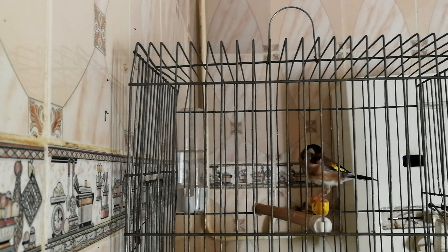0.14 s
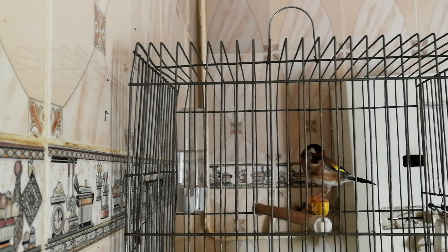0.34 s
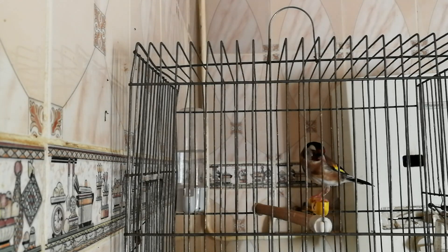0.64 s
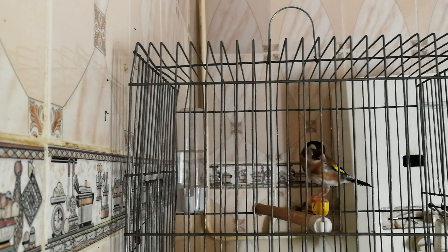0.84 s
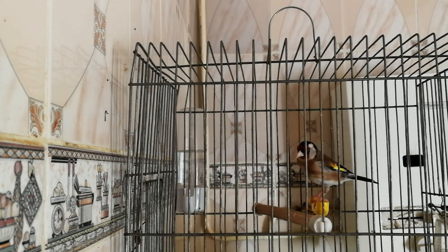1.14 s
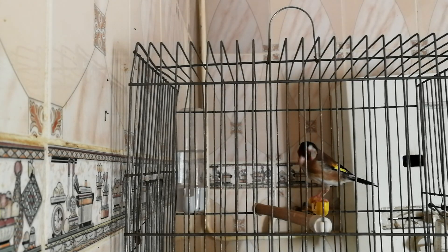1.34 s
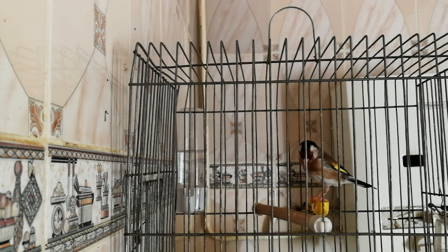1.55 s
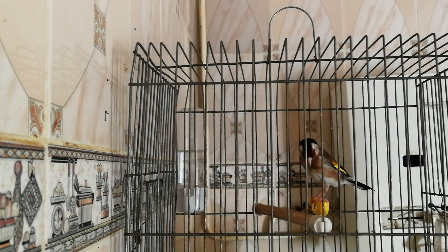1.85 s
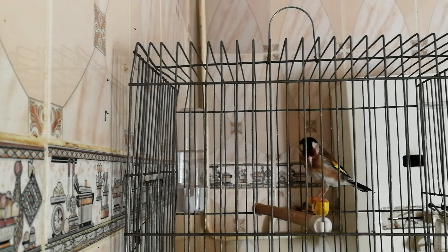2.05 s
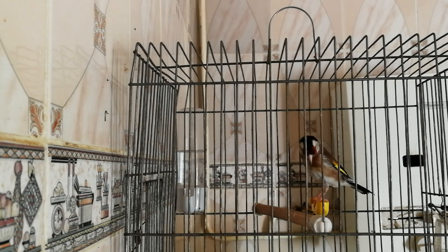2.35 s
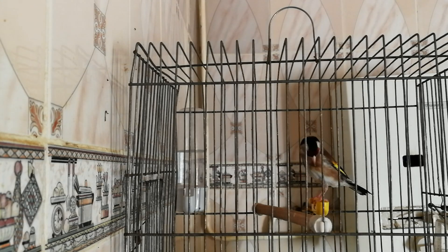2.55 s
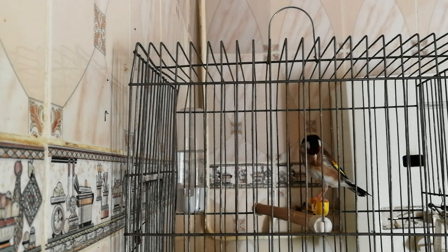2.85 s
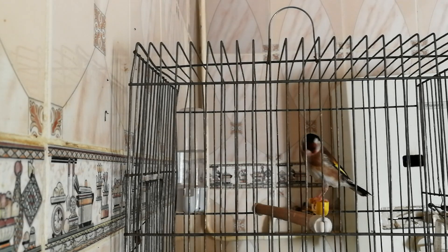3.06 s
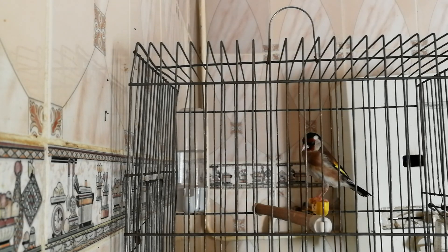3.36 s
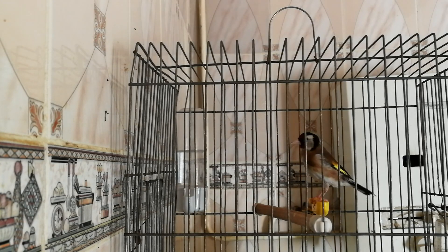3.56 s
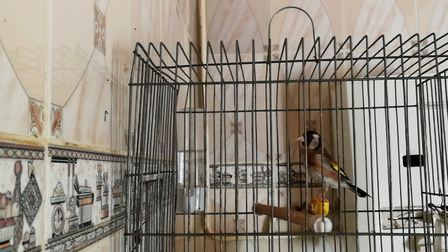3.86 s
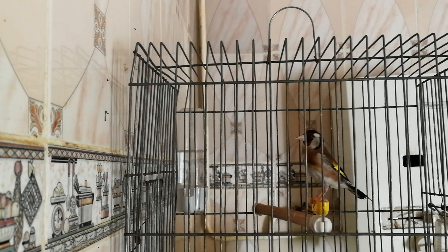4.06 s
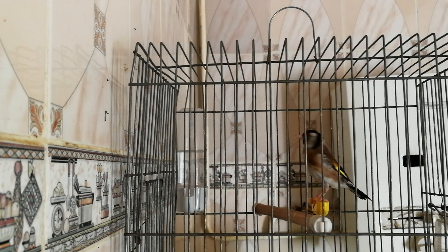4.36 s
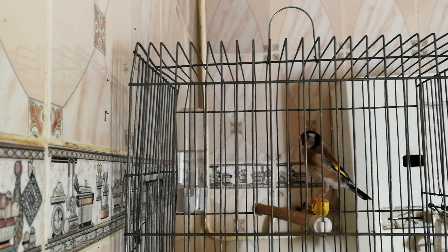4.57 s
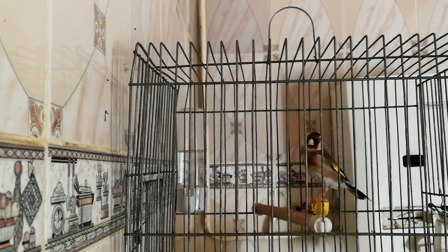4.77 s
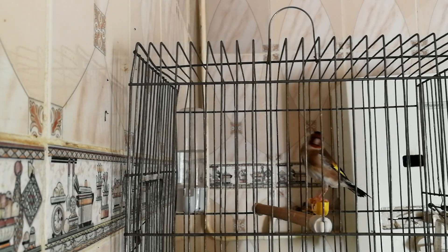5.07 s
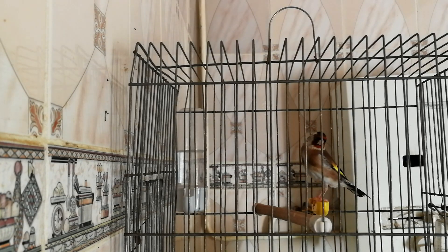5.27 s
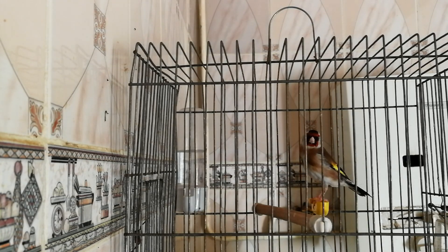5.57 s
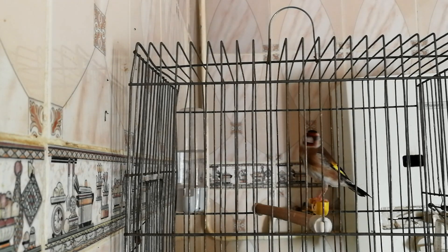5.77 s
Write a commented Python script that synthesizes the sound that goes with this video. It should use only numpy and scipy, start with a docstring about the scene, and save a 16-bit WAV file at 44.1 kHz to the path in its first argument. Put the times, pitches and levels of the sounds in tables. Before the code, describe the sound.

A small finch twitters in a cage in a tiled room, close to the microphone. Scattered soft whistles and short buzzy trills come first, then a quick burst of loud, sharp chirps just past the middle and two more chirps a second later. Feathers rustle faintly, beak or claws tick on the cage, and a soft knock comes near the end. A faint motor hum runs underneath.

```python
"""A caged goldfinch sings in a tiled room, close to a stereo microphone.
Its syrinx makes near-pure tones: a few loud, fast-gliding calls up front, and between them
soft whistles and trilled churrs that reach the microphone mostly off the walls.
Feathers rustle, beak and claws tick on the cage, and dull shuffles and knocks come from
further off to the left, all over a household motor's hum, a faint whine and room tone."""
import sys
import numpy as np
from scipy import signal
from scipy.fft import rfft, irfft, next_fast_len
from scipy.io import wavfile

SR = 44100
rng = np.random.default_rng(int(sys.argv[2]) if len(sys.argv) > 2 else 0)


def materialize(psi):
    """Save the field psi as 16-bit PCM at rate SR to the path in sys.argv[1].

    A 1-D psi becomes a single channel; in a 2-D psi each row is a channel.
    """
    bounded = np.clip(np.atleast_2d(psi).T, -1, 1)
    quanta = np.round(bounded * 32767).astype(np.int16)
    wavfile.write(sys.argv[1], SR, quanta)


N = 261072


def amp(db):
    return 10 ** (np.asarray(db) / 20)


def evened(x):
    return x / np.sqrt(np.mean(x ** 2) + 1e-20)


def read(points, hz):
    f, value = np.transpose(points)
    return np.interp(np.log(hz + 1), np.log(f + 1), value)


def add(mix, s, sound):
    part = mix[max(round(s * SR), 0):][:len(sound)]
    part += sound[:len(part)]


def colour(x, points, lag=None):
    """Filters by a (Hz, dB) curve, with an optional (Hz, s) curve of delay."""
    size = next_fast_len(x.shape[-1] + SR // 10)
    hz = np.fft.rfftfreq(size, 1 / SR)
    delay = np.exp(-2j * np.pi * hz * read(lag, hz)) if lag else 1
    return irfft(rfft(x, size) * amp(read(points, hz)) * delay, size)[..., :x.shape[-1]]


def wander(rate_hz):
    """Random drift of unit RMS, up to about the given rate."""
    size = next_fast_len(N)
    hz = np.fft.rfftfreq(size, 1 / SR)
    return evened(irfft(rfft(rng.standard_normal(size)) * np.exp(-(hz / rate_hz) ** 2), size)[:N])


def swells(rows):
    """Power over time of movements that swell and fade smoothly."""
    t = np.arange(N) / SR
    return sum(amp(db) ** 2 * np.exp(-((t - s) / half) ** 2) for s, half, db in rows)


def rustles(tick_power, grain_db=4.0, body_db=-10.5):
    """Grainy friction noise: bright for feathers and ticks, dull for shuffles and the feathers' body."""
    # near feathers and far shuffles: (peak time [s], half length [s], level [dB])
    feathers = [(-.019, 0.044, -46), (.156, 0.13, -61), (.28, 0.045, -59), (.403, 0.031, -54.5),
                (2.125, 0.042, -66), (2.222, .034, -68), (2.837, 0.019, -59.5), (3.085, 0.03, -57),
                (3.204, 0.041, -65.5), (4.02, 0.054, -64.5), (4.424, 0.043, -62.5), (4.95, 0.095, -61.5),
                (5.2, 0.024, -64), (5.309, 0.016, -65), (5.803, 0.083, -66)]
    shuffles = [(-.019, 0.052, -48.5), (4.157, 0.045, -57), (5.23, 0.1, -61), (5.536, 0.053, -65.5),
                (5.803, 0.094, -62)]
    # friction spectra: (frequency [Hz], gain [dB])
    bright_colour = [(100, -33.5), (1000, -42), (2200, -1), (4000, 0), (7000, 2), (9300, 0.5), (11500, -11),
                     (15500, -19.5)]
    dull_colour = [(100, -4), (600, -7), (1000, -6.5), (1500, 2.5), (2200, -6.5), (4000, -13.5),
                   (15000, -39)]
    feather_power = swells(feathers)
    dull_power = swells(shuffles) + amp(body_db) ** 2 * feather_power
    bright_grain, dull_grain = rng.standard_normal((2, N)) * amp(grain_db * wander(300))
    bright = np.sqrt(feather_power + tick_power) * evened(colour(bright_grain, bright_colour))
    dull = np.sqrt(dull_power) * evened(colour(dull_grain, dull_colour))
    return bright, dull


def motor_hum(waver_hz=7):
    """A household motor's low tones, dead centre, each wavering in strength and phase."""
    # motor tones: (frequency [Hz], level [dB], wavering [share])
    tones = [(83.3, -75.5, .6), (117.4, -62.5, 0.31), (152, -77, .8), (198.8, -65, 0.65), (244, -65.5, .9),
             (276.4, -66, 0.82), (296, -72.5, 0.44), (926, -84, .8)]
    t = np.arange(N) / SR
    out = np.zeros(N)
    for hz, db, waver in tones:
        sway = 1 + waver * (wander(waver_hz) + 1j * wander(waver_hz))
        out += amp(db) * evened((sway * np.exp(2j * np.pi * hz * t)).real)
    return out


def whine(waver_hz=110):
    """Faint electrical whine: narrow, slightly fuzzy tones, unrelated left and right."""
    # high tones: (frequency [Hz], level [dB])
    tones = [(4240, -96.5), (5080, -81), (7620, -85.5)]
    t = np.arange(N) / SR
    out = np.zeros((2, N))
    for channel in out:
        for hz, db in tones:
            fuzz = wander(waver_hz) + 1j * wander(waver_hz)
            channel += amp(db) * evened((fuzz * np.exp(2j * np.pi * hz * t)).real)
    return out


def room_tone(level_db=-61):
    """The room's still air: steady noise, alike in both channels only in the bass."""
    # noise spectrum: (frequency [Hz], relative density [dB])
    spectrum = [(25, -2), (60, -6), (110, -6), (170, -3.5), (260, -2), (390, -6), (600, -13.5), (950, -12),
                (1600, -13.5), (2800, -21.5), (5000, -21.5), (8500, -24), (11500, -30.5), (15500, -32)]
    # likeness of the channels: (frequency [Hz], correlation [-1 to 1])
    correlation = [(30, 0.97), (130, 1), (280, 0.63), (500, -0.42), (1000, -0.00085), (3000, 0.067),
                   (15000, -0.074)]
    # stereo balance: (frequency [Hz], left minus right [dB])
    balance = [(100, 0.5), (500, 3), (1200, 4), (2200, 5), (3300, -3.5), (6000, 0), (10000, 2),
               (15000, -0.5)]
    hz = np.fft.rfftfreq(N, 1 / SR)
    common, separate = rfft(rng.standard_normal((2, N)))
    same = np.clip(read(correlation, hz), -1, 1)
    tilt = amp(read(balance, hz) / 2)
    pair = np.array([common * tilt, (same * common + np.sqrt(1 - same ** 2) * separate) / tilt])
    return amp(level_db) * evened(irfft(pair * amp(read(spectrum, hz)), N))


def syrinx(hz, overtones_db, beak, fourth_db=-3, slack_hz=2750):
    """A near sine tuned by the throat; overtones escape through the beak, the fourth at low pitch."""
    # throat's response: (frequency [Hz], gain [dB])
    throat = [(2000, 0), (2600, -5.5), (3300, -6.5), (4100, -1), (4900, 0), (5600, -2), (6500, 11.5)]
    phase = 2 * np.pi * np.cumsum(hz) / SR
    second, third, fourth = (amp(read(beak, k * hz)) * (k * hz < SR / 2) * np.sin(k * phase)
                             for k in (2, 3, 4))
    slack = 1 / (1 + (hz / slack_hz) ** 10)  # slack membranes clap together and sound richer
    overtones = second + third + amp(fourth_db) * slack * fourth
    return np.sqrt(2) * (amp(read(throat, hz)) * np.sin(phase) + amp(overtones_db) * overtones)


def soft_note(length, pitch_hz, rise, warble, overtones_db, arch=0.048):
    """A soft note whose pitch slides in a slight arch, shaken by the warble."""
    # half-shut beak's response: (frequency [Hz], gain [dB])
    beak = [(4200, -14), (5200, -12), (6000, -5), (7400, 1.5), (8200, -12), (9200, -3.5), (10200, -12),
            (13000, -25), (16000, -32)]
    progress = np.linspace(0, 1, int(length * SR))
    bow = np.sin(np.pi * progress)
    contour_hz = pitch_hz * (1 + rise * (progress - .5)) * (1 + arch * (bow - 2 / np.pi))
    hz = contour_hz * (1 + warble[:len(progress)])
    return abs(bow) ** 0.098 * evened(syrinx(hz, overtones_db, beak))


def subsong(trill_hz=110, uneven=.3, rasp=0.392, churr_s=0.072):
    """One fast, uneven trill barely stirs the soft whistles and shakes the buzzy churrs deeply."""
    # whistles: (time [s], length [s], pitch [Hz], level [dB], overtones [dB])
    whistles = [(.002, 0.037, 4110, -52.5, -25), (0.152, 0.044, 2870, -51.5, -24),
                (0.735, 0.063, 2770, -54.5, -24), (1.574, 0.037, 2780, -55, -23),
                (1.606, 0.039, 2893, -39.5, -29), (1.999, 0.0574, 2813, -51, -22.5),
                (2.554, 0.035, 2720, -42, -27.5), (3.07, .056, 2864, -50.5, -30)]
    # churrs, most answering a whistle: (time [s], pitch [Hz], rise [share], level [dB], overtones [dB])
    churrs = [(.07, 3350, 0.024, -53.5, -14), (.256, 3060, 0.14, -52.5, -10.5),
              (.538, 4160, -0.15, -62.5, -28), (0.86, 3087, 0.012, -54.5, -24),
              (1.686, 3035, 0.017, -53.5, -22), (2.102, 3000, .08, -50, -17),
              (2.188, 3132, 0.115, -49.5, -16), (3.178, 3037, 0.047, -52, -26),
              (4.151, 2710, 0.051, -55.5, -16)]
    whistle_rise, whistle_warble, churr_warble = .075, 0.055, 0.159  # shares of the pitch
    out, shake = np.zeros(N), wander(426)
    trill_phase = 2 * np.pi * np.cumsum(trill_hz * (1 + uneven * wander(79.8))) / SR
    trill = np.clip(np.sin(trill_phase) + rasp * shake, -1.4, 1)
    for s, length, hz, db, overtones_db in whistles:
        warble = whistle_warble * trill[int(s * SR):]
        add(out, s, amp(db) * soft_note(length, hz, whistle_rise, warble, overtones_db))
    for s, hz, rise, db, overtones_db in churrs:
        warble = churr_warble * trill[int(s * SR):]
        add(out, s, amp(db) * soft_note(churr_s, hz, rise, warble, overtones_db))
    return out


def glide(length, start_hz, goal_hz, glide_s, bend):
    """Pitch that slides fast towards its goal; a bend over 1 starts slowly."""
    t = np.arange(int(length * SR)) / SR
    return goal_hz + (start_hz - goal_hz) * np.exp(-(t / glide_s) ** bend)


def loud_note(hz, shake, attack_s, db, overtones_db, jitter=0.0092, onset_rasp=1.9, rasp_s=0.0073):
    """Air pressure swells and is cut off as the syrinx sounds; onsets and low pitches are rough."""
    # beak's response: (frequency [Hz], gain [dB])
    beak = [(4500, 3.5), (5500, -12.5), (6200, -5), (6700, 2.5), (7300, -8), (8400, -18), (9400, 0),
            (10100, -14), (11000, -4.5), (11800, -12.5), (12600, -16.5), (13400, -11), (14500, -28),
            (16000, -26.5)]
    t = np.arange(len(hz)) / SR
    roughness = jitter * (2700 / hz) ** .6 * (1 + onset_rasp * np.exp(-t / rasp_s))
    hz = hz * (1 + roughness * shake[rng.integers(N // 2):][:len(hz)])
    peak_s = min(attack_s, .9 * t[-1])
    pressure = np.sin(np.interp(t, [0, peak_s, t[-1]], [0, np.pi / 2, np.pi]))
    # the overtones stay level however loud the note
    return amp(db) * pressure * syrinx(hz, overtones_db - db, beak)


def tinks(shake):
    """Close "tink" calls: one quick scoop up to a held pitch."""
    # calls: (time [s], length [s], level [dB], attack [s])
    calls = [(1.242, 0.03, -33, 0.017), (3.414, 0.043, -29, .016), (3.592, 0.044, -26, 0.02),
             (4.646, 0.028, -31, 0.012)]
    out = np.zeros(N)
    for s, length, db, attack_s in calls:
        scoop = glide(length, start_hz=2392, goal_hz=3340, glide_s=.0073, bend=1.67)
        add(out, s, loud_note(scoop, shake, attack_s, db, overtones_db=-34))
    return out


def cage_ticks(rise_s=0.0019):
    """Power over time of beak and claws on the cage: tiny scrapes that swell and die."""
    # scrapes: (time [s], level [dB])
    ticks = [(1.476, -64), (2.107, -42.5), (3.124, -43.5), (4.316, -61.5), (5.183, -60), (5.613, -59.5)]
    age = np.arange(SR // 10) / SR / rise_s
    power = np.zeros(N)
    for s, db in ticks:
        add(power, s, (amp(db) * age * np.exp(1 - age)) ** 2)
    return power


def zips(shake, flick_s=0.011, flick_gain_db=-11.5, sweep_delay_s=.0065):
    """Close "zip" calls: the pitch flicks down, then sweeps loudly upward."""
    # calls: (time [s], sweep length [s], sweep glide time [s], level [dB])
    calls = [(3.499, 0.043, 0.024, -19), (4.779, 0.029, 0.02, -21.5)]
    out = np.zeros(N)
    for s, length, glide_s, db in calls:
        flick = glide(flick_s, start_hz=3990, goal_hz=2670, glide_s=.0056, bend=2.6)
        sweep = glide(length, start_hz=2660, goal_hz=5490, glide_s=glide_s, bend=.93)
        add(out, s, loud_note(flick, shake, flick_s / 2, db + flick_gain_db, overtones_db=-34))
        add(out, s + sweep_delay_s, loud_note(sweep, shake, attack_s=0.018, db=db, overtones_db=-32))
    return out


def tsee(shake, at_s=3.7, attack_s=0.0089, upper_delay_s=0.0062, upper_s=0.01, upper_hz=6350):
    """A high "tsee" in two voices: one side of the syrinx falls, the other joins on a steady pitch."""
    falling = glide(length=0.031, start_hz=5840, goal_hz=5320, glide_s=0.0138, bend=1.43)
    upper = np.full(int(upper_s * SR), upper_hz)
    out = np.zeros(N)
    add(out, at_s, loud_note(falling, shake, attack_s, db=-22.5, overtones_db=-26.5))
    add(out, at_s + upper_delay_s, loud_note(upper, shake, attack_s, db=-32.5, overtones_db=-65))
    return out


def knocks(rise_s=0.0064):
    """Soft scuffing blows on a hollow body, well off the microphone."""
    # blows: (time [s], level [dB])
    blows = [(4.159, -57), (5.733, -41.5)]
    # body resonances: (frequency [Hz], gain [dB])
    body = [(300, -27), (700, -20), (950, -1.5), (1150, -3), (1430, 12), (1650, -2.5), (2100, -14),
            (4000, -40), (15000, -50)]
    age = np.arange(SR // 8) / SR / rise_s
    force = np.zeros(N)
    for s, db in blows:
        add(force, s, amp(db) * age * np.exp(1 - age))
    return force * evened(colour(rng.standard_normal(N), body))


def direct(x):
    """The straight path reaches the microphone's left side first and with more treble."""
    # response on each side: (frequency [Hz], gain [dB])
    left = [(2500, 7), (3300, -13), (4400, -1.5), (5600, 0), (6600, -4), (10000, 5), (14000, 3)]
    right = [(2500, 2), (3300, 0.5), (4400, 0), (5600, -12), (6600, -16.5), (10000, -16), (14000, -10.5)]
    # right side's lag, bent by a bounce off the near wall: (frequency [Hz], delay [s])
    right_lag = [(2800, .0006), (3350, .00064), (4100, .00052), (4600, .00046), (5500, .00054),
                 (6600, .00058), (9600, .00063), (12000, .00061)]
    return np.array([colour(x, left), colour(x, right, right_lag)])


def room(x, gap_s=0.002, early_s=0.0091):
    """Tiled walls: dense reflections, strongest at first, each band dying at its own speed."""
    # reverberation: (frequency [Hz], time to fall 60 dB [s])
    t60 = [(1000, 0.23), (3200, 0.42), (5500, 0.37), (10000, 0.26), (15000, 0.18)]
    hz, frame_s, bands = signal.stft(rng.standard_normal((2, SR)), SR, nperseg=256)
    decay = amp(-60 * frame_s / read(t60, hz)[:, None])
    tail = signal.istft(bands * decay, SR, nperseg=256)[1]
    t = np.arange(tail.shape[1]) / SR
    tail *= np.clip(t / gap_s - 1, 0, 1) * (1 + np.exp(-t / early_s))
    tail /= np.linalg.norm(tail, axis=1, keepdims=True)
    return signal.fftconvolve(x[None], tail, axes=1)[:, :N]


def scene():
    """Close calls, echoing subsong and small noises share one room; paired gains are left, right."""
    # colour of the loud calls' echo: (frequency [Hz], gain [dB])
    echo_colour = [(1000, 0), (2900, 7), (3400, 2.5), (4200, -2), (4800, -6), (5600, -4), (6600, -11),
                   (10000, -2.5), (14000, -6)]
    shake = wander(2270)  # pitch jitter of the loud calls
    loud = tinks(shake) + zips(shake) + tsee(shake)
    soft = subsong()
    bright, dull = rustles(cage_ticks())
    song = direct(loud) + amp(-1.5) * room(colour(loud, echo_colour))
    twitter = amp(-12.5) * direct(soft) + amp([[-1], [.5]]) * room(soft)
    near_stir = amp(-3) * direct(bright) + amp(1.5) * room(bright)
    far_stir = amp([[0], [-7]]) * room(dull + knocks())
    return song + twitter + near_stir + far_stir + motor_hum() + whine() + room_tone()


def record(dry):
    """The recorder's band limit."""
    edge_hz = 15700
    lowpass = signal.firwin(511, edge_hz, window=("kaiser", 9), fs=SR)
    return signal.oaconvolve(dry, lowpass[None], "same")


dry = scene()
out = record(dry)
materialize(out)
```